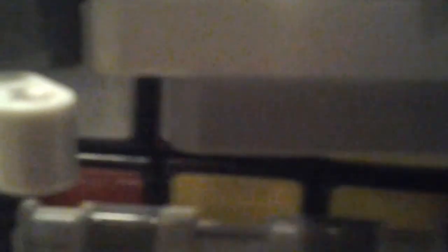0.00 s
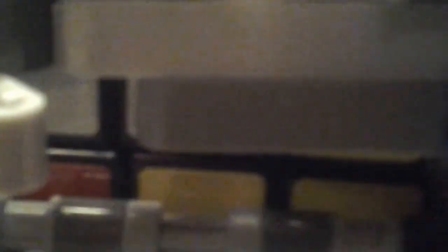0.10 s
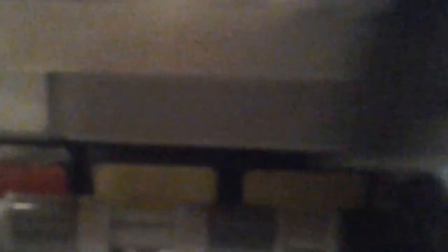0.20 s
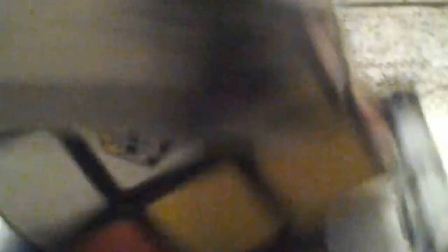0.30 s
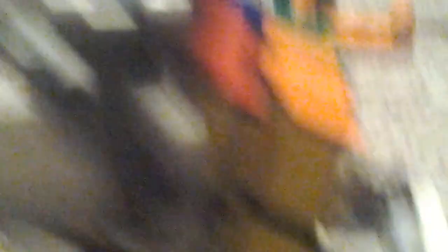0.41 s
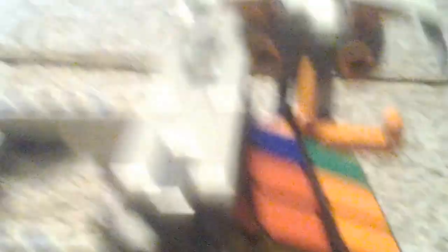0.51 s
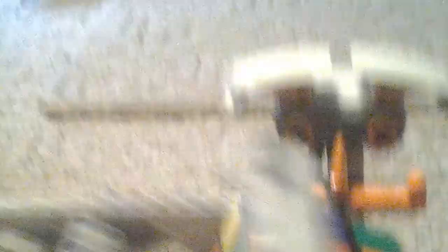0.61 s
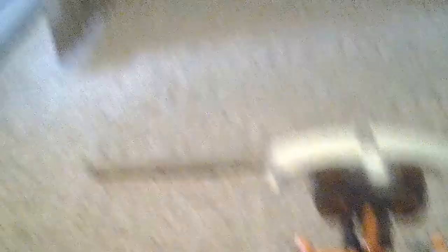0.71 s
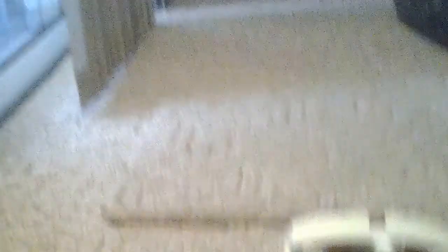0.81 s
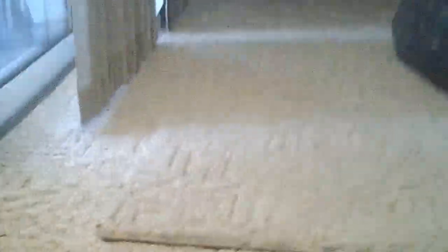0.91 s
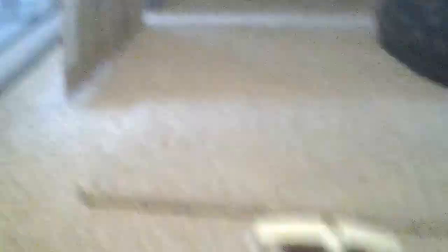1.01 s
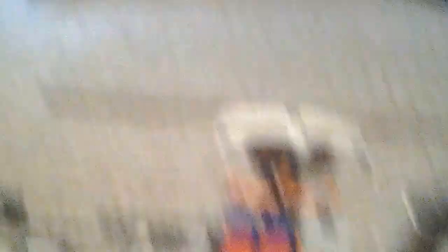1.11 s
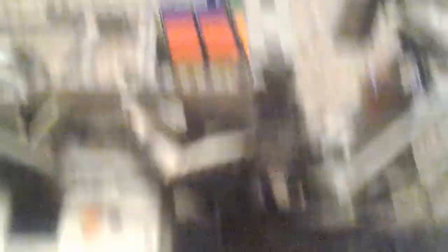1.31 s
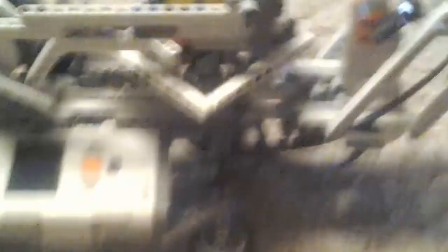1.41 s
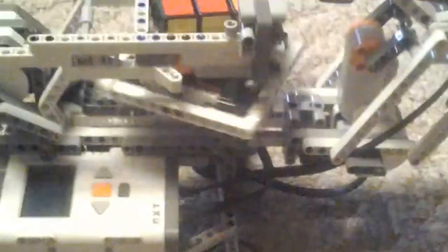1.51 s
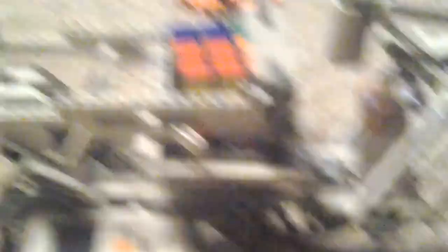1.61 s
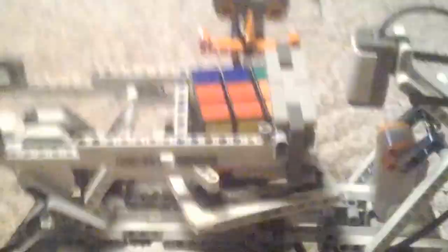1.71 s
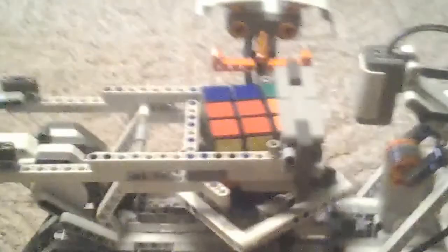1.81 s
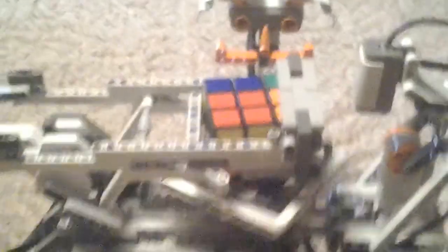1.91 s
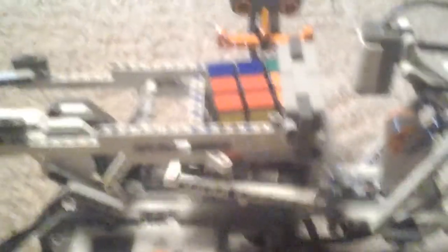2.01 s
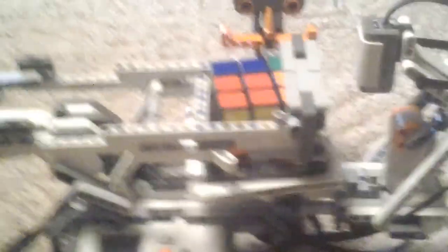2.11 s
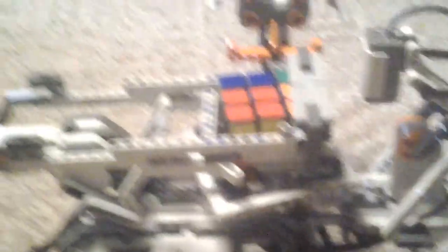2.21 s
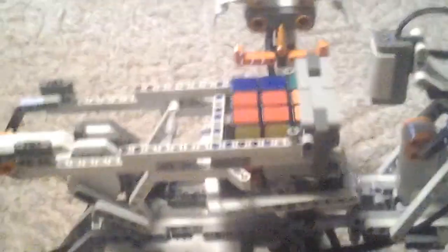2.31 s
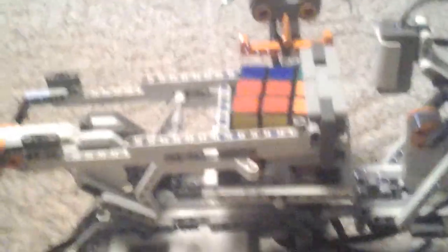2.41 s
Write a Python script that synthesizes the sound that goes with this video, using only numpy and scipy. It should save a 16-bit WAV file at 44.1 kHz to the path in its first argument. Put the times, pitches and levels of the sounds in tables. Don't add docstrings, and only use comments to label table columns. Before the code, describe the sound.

Toy robot motors whine, stutter and coast to a stop as plastic puzzle cube parts clack

```python
import sys
import numpy as np
from scipy import signal
from scipy.fft import rfft, irfft
from scipy.io import wavfile
from scipy.ndimage import uniform_filter1d

SR = 44100
rng = np.random.default_rng(int(sys.argv[2]) if len(sys.argv) > 2 else 0)


def unload_wav(signal):
    wavfile.write(
        sys.argv[1],
        SR,
        np.round(np.clip(np.atleast_2d(signal).T, -1, 1) * 32767).astype(np.int16),
    )


def ratio_of_db(decibels):
    return 10 ** (np.asarray(decibels, float) / 20)


N = 108045


def level(x):
    return x / np.sqrt(np.mean(x ** 2) + 1e-20)


def peak_one(x):
    return x / np.abs(x).max()


def decay(t, t60_s):
    return np.exp(-np.log(1000) * t / t60_s)


def walk(rate_hz):
    hold = max(int(SR / rate_hz), 2)
    steps = np.repeat(rng.standard_normal(N // hold + 1), hold)
    return 2 * np.tanh(uniform_filter1d(steps, hold)[:N] / 1.5)


def band(x, hz, width_hz):
    b, a = signal.iirpeak(hz, hz / max(width_hz, 20), fs=SR)
    return signal.lfilter(b, a, x)


def body(x, peaks, own_db=0):
    total = 0
    for k, (hz, width_hz, db) in enumerate(peaks):
        wide = 1.16 * width_hz
        ring = band(band(x, hz, wide), hz, wide)
        throb_db = own_db * walk(110) if own_db else 0
        total = total + (-1) ** k * ratio_of_db(db + throb_db) * ring
    return total


def motor(rows, orders, peaks, wander, flutter_db, tick_db, chatter_db, chatter_rate):
    t = np.arange(N) / SR
    start_s, mesh_hz, level_db, rough, bright_db = np.array(rows, float).T
    rough = np.clip(np.interp(t, start_s, rough), 0, 1)
    bright_db = np.interp(t, start_s, bright_db)
    speed_hz = np.interp(t, start_s, mesh_hz) * (1 + wander * walk(60))
    turn = 2 * np.pi * np.cumsum(speed_hz) / SR

    whine = 0
    for k, order_db in orders:
        tilt_db = bright_db * (k - 5.5) * (abs(k - 6) < 2)
        tone_db = order_db + tilt_db + min(flutter_db, 5) * walk(chatter_rate / 2)
        whine = whine + ratio_of_db(tone_db) * np.sin(k * turn + 2 * np.pi * rng.random())

    ticks = rng.standard_normal(N) * ratio_of_db(tick_db * np.minimum(rng.exponential(size=N), 6))
    backlash = level(body(ticks, peaks, own_db=chatter_db))
    backlash = backlash * ratio_of_db(chatter_db * walk(chatter_rate) / 2)

    mix = np.sqrt(1 - rough) * level(whine) + np.sqrt(rough) * backlash
    mix = level(mix * ratio_of_db(chatter_db * walk(21.77) / 2))
    running = (t > start_s[0]) & (t < start_s[-1])
    on = uniform_filter1d(1. * running, 200)
    return mix * ratio_of_db(np.interp(t, start_s, level_db)) * on


def hits(rows, peaks, t60_s, crack_db, tail_db, rise_s):
    length = 9000
    out, t = np.zeros(N + length), np.arange(length) / SR
    rise = np.minimum(1, (t + 1 / SR) / max(rise_s, 1 / SR))
    crack_t60_s, tail_t60_s, body_ring_db = 0.0041, 0.066, -1
    for start_s, peak_db, ring_hz in rows:
        noise = rng.standard_normal(length)
        noise[:2] = 4, -4
        noise = noise * rise
        push = noise * (decay(t, crack_t60_s) + ratio_of_db(tail_db) * decay(t, tail_t60_s))
        ring = band(noise * decay(t, max(t60_s / 3, .002)), ring_hz, 8.1 / max(t60_s, .005))
        housing = body(push, peaks)
        crack = np.diff(push, prepend=0)
        one = peak_one(ring) + ratio_of_db(body_ring_db) * peak_one(housing) + ratio_of_db(crack_db) * peak_one(crack)
        i = int(start_s * SR)
        out[i:i + length] += ratio_of_db(peak_db) * peak_one(one)
    return out[:N]


# pitch_hz [Hz], level_db [dB per Hz]
ROOM_COLOUR = [(18, -44), (30, -4.5), (417, 10.5), (1740, -0.5), (2130, 9.5), (2670, -39), (4750, -13.5),
               (7450, -16.5), (12000, -3), (15600, -52), (22000, -120)]


def room():
    hz = np.maximum(np.fft.rfftfreq(N, 1 / SR), 1)
    point_hz, point_db = np.array(ROOM_COLOUR).T
    shape = ratio_of_db(np.interp(np.log(hz), np.log(point_hz), point_db))
    hiss = level(irfft(rfft(rng.standard_normal(N)) * shape, N))
    return hiss * ratio_of_db(-52 + 0.5 * walk(12.0))


# time_s [s], level_db [dB]
SLIDING = [(0, -26.5), (0.029, -51.5), (.4, -30), (.45, -26), (.52, -35.5), (.535, -48.5), (.9, -37.5),
           (0.988, -30.5), (1.06, -44), (1.131, -34.5), (1.199, -28), (1.3, -52), (2.405, -64),
           (2.435, -34)]
# pitch_hz [Hz], width_hz [Hz], level_db [dB]
CUBE_BODY = [(490, 1200, -33.5), (1490, 1850, -18), (2800, 1670, -9.5), (4595, 2180, -5.5),
             (7340, 3000, -29.5)]


def rustle():
    grains = rng.standard_normal(N) * ratio_of_db(3 * rng.exponential(size=N)) * ratio_of_db(3 * walk(70))
    time_s, level_db = np.array(SLIDING).T
    return level(body(grains, CUBE_BODY)) * ratio_of_db(np.interp(np.arange(N) / SR, time_s, level_db))


# start_s [s], peak_db [dB], ring_hz [Hz]
CLICK_HITS = [(0.0098, -17.5, 3800), (0.0503, -26, 4700), (0.0792, -22.5, 5300), (0.0893, -30, 4550),
              (0.1163, -40, 4700), (0.1223, -15.5, 5430), (0.139, -26, 3200), (0.158, -23, 3800),
              (0.1736, -27.5, 5140), (0.184, -25, 3960), (0.3396, -12, 4500), (0.343, -8.5, 4600),
              (0.3511, -6, 3760), (0.3596, -6, 3840), (0.362, -10.5, 5000), (0.366, -18, 1860),
              (0.3967, 3, 3082), (0.4018, -2, 4600), (0.4408, -14.5, 4230), (0.4873, -15, 2820),
              (0.5106, -12, 2800), (0.5412, -32, 4870), (0.556, -16, 4430), (0.5668, -40.5, 4350),
              (0.5703, -26, 4430), (1.0309, -15, 5080), (1.074, -31, 4170), (1.0859, -23, 5430),
              (1.1487, -19.5, 4710), (1.4135, -1.5, 7570), (2.4218, -28, 4340), (2.4336, -18, 4370)]


def clicks():
    return hits(CLICK_HITS, CUBE_BODY, t60_s=0.029, crack_db=-11.5, tail_db=-1, rise_s=0)


# start_s [s], mesh_hz [Hz], level_db [dB], roughness [0-1], bright_db [dB per multiple]
ARM_RUN = [(.185, 439.5, -30, 1.1, 3), (.203, 459.7, -14, 1.1, 4.5), (.232, 560, -10, 0.68, 7.5),
           (.25, 628, -9.5, 0.36, 5.5), (.268, 673.6, -8, 0.34, -1), (.29, 684.4, -10, 0.26, 1),
           (.31, 701.7, -9, 0.37, -1), (.332, 738.6, -10, 0.35, -4.5), (.345, 734, -30, 0.99, -6.5)]
# multiple [of the mesh rate], level_db [dB]
ARM_WHINE = [(1, -44), (2, -18), (3, -12), (4, -17), (5, 2), (6, -5), (7, 0.5), (8, -11.5), (9, -15),
             (10, -26.5), (11, -15.5), (12, -35)]
# pitch_hz [Hz], width_hz [Hz], level_db [dB]
ARM_HOUSING = [(1440, 550, -19.5), (2412, 600, -13.5), (3630, 850, -5), (4370, 1127, -4), (6200, 2250, -15),
               (7990, 1290, -14.5), (10500, 2600, -19)]


def arm_motor():
    return motor(ARM_RUN, ARM_WHINE, ARM_HOUSING, wander=0.00198, flutter_db=1.5,
                 tick_db=1.2, chatter_db=1.0, chatter_rate=150)


# start_s [s], peak_db [dB], ring_hz [Hz]
JOLT_HITS = [(.230, -2.5, 3748), (.589, -4.5, 4500), (.600, -1.5, 4150), (.605, -7, 3870), (.614, -1, 4570),
             (.631, -1, 6470), (.641, -6.5, 4500), (.649, -3.5, 4600), (.665, -10.5, 4270),
             (.6706, -3.5, 4500), (.673, -5, 6400), (.679, -3, 4540), (.687, -12, 6340),
             (.6945, -7.5, 5170), (.7005, -20, 4250), (.7065, -2.5, 4600), (.710, -3.5, 2800),
             (.7155, -2.5, 4330), (.727, -3.5, 4500), (.753, -10.5, 3000), (.7705, -6.5, 3860),
             (.776, -5.5, 4220), (.788, -13.5, 4160), (.801, -13, 2500), (.8195, -13, 4430),
             (.8447, -4.5, 4600), (.87, -7, 3780), (.902, -19.5, 2470), (1.213, -15.5, 3700),
             (1.275, -9, 4500), (1.685, -11.5, 4500), (1.9485, -15.5, 2340), (2.014, -10, 4570),
             (2.111, -9.5, 4290), (2.278, -22.5, 2260), (2.326, -22.5, 2240), (2.405, -37, 2360)]
# pitch_hz [Hz], width_hz [Hz], level_db [dB]
TWIST_HOUSING = [(1140, 1000, -23.5), (2820, 1071, -5.5), (4430, 840, 2), (3930, 1400, -11),
                 (6470, 550, -10.5), (8500, 2100, -21), (10140, 1800, -19.5)]


def jolts():
    return hits(JOLT_HITS, TWIST_HOUSING, t60_s=0.035, crack_db=-36.5, tail_db=-11, rise_s=0.0019)


# start_s [s], mesh_hz [Hz], level_db [dB], roughness [0-1],
# bright_db [dB per multiple]
TWIST_RUN = [(.555, 473.3, -31, 0.87, 7.5), (.592, 530, -17, 0.77, 1.5), (.625, 635.7, -13.5, 0.64, 1),
             (.655, 658, -15, 0.85, 8), (.665, 640, -18.5, 0.9, 3), (.74, 625.5, -20, 1.23, 8),
             (.81, 625, -24.5, 1.06, 9), (.88, 630, -18.5, 0.77, 5), (.915, 620, -34.5, 0.7, 0)]


def twist_motor():
    return motor(TWIST_RUN, ARM_WHINE[2:8], TWIST_HOUSING, wander=0.0072, flutter_db=4,
                 tick_db=2.5, chatter_db=3.5, chatter_rate=170)


# start_s [s], length_s [s], peak_db [dB], pitch_hz [Hz]
SLIPS = [(0.618, .013, -4, 4465), (0.653, 0.0069, -15, 4600), (.715, .006, -9.5, 4310),
         (0.723, 0.0094, -6, 4370), (0.769, 0.0061, -9.5, 4320), (0.777, .008, -14, 4250),
         (0.824, 0.012, -12, 4370), (0.832, 0.00647, -12.5, 4350), (2.435, 0.0141, -22.5, 4480)]


def squeals():
    out, flutter = np.zeros(N + 2000), ratio_of_db(2.5 * walk(400))
    rise_hz_per_s = 6000
    for start_s, length_s, peak_db, pitch_hz in SLIPS:
        t = np.arange(int(length_s * SR)) / SR
        swell = np.sin(np.pi * t / length_s) ** 0.67
        hz = pitch_hz + rise_hz_per_s * (t - length_s) / 2
        i = int(start_s * SR)
        out[i:i + len(t)] += ratio_of_db(peak_db) * swell * np.sin(2 * np.pi * hz * t)
    return out[:N] * flutter


# start_s [s], peak_db [dB], pitch_hz [Hz], t60_s [s], width [share of pitch]
KNOCKS = [(.706, -20, 1013, 0.065, 0.6), (.832, -27.5, 284, 0.112, 1.25), (0.935, -36.5, 289.6, 0.4, 1.4),
          (.985, -28, 467, 0.29, 0.83), (1.373, -11.5, 1290, 0.0073, 2.8), (1.486, -21, 508, 0.035, 0.89),
          (1.717, -33.5, 364, 0.079, .8)]


def thuds():
    length = 9000
    out, t = np.zeros(N + length), np.arange(length) / SR
    for start_s, peak_db, pitch_hz, t60_s, share in KNOCKS:
        push = rng.standard_normal(length) * decay(t, max(t60_s, .005))
        width_hz = share * pitch_hz
        one = band(band(push, pitch_hz, width_hz), pitch_hz, width_hz)
        i = int(start_s * SR)
        out[i:i + length] += ratio_of_db(peak_db) * peak_one(one)
    return out[:N]


# start_s [s], mesh_hz [Hz], level_db [dB], roughness [0-1], bright_db [dB per multiple]
TABLE_RUN = [(1.13, 741, -47, 0.8, 5.5), (1.21, 771.4, -27.5, 0.97, 7), (1.28, 779.5, -14.5, 0.8, 5),
             (1.4, 777.7, -17, 0.75, 3.5), (1.53, 791.1, -19.5, 0.82, 2), (1.7, 829.4, -20, 0.95, -9),
             (1.8, 802.2, -19.5, .75, -0.5), (1.87, 769, -16.5, 0.56, 0), (1.97, 762, -19.5, 0.59, 3),
             (2.04, 807, -19.5, 0.98, -4), (2.165, 844, -19, 0.8, -2), (2.22, 796.7, -43.5, 0.95, -2)]
# multiple [of the mesh rate], level_db [dB]
TABLE_WHINE = [(1, -32), (2, -8.5), (3, -2.5), (4, -13), (5, 0.5), (6, -1.5), (7, -7.5), (8, -16)]
# pitch_hz [Hz], width_hz [Hz], level_db [dB]
TABLE_HOUSING = [(530, 82, -17.5), (819, 113, -13.5), (1160, 400, -20.5), (1487, 290, -15.5),
                 (2173, 347, 4), (3440, 540, -10.5), (3960, 390, 0), (4600, 480, 1), (5242, 650, -7),
                 (6610, 670, -6), (8090, 1384, -16), (9950, 1310, -22.5)]


def table_motor():
    return motor(TABLE_RUN, TABLE_WHINE, TABLE_HOUSING, wander=0.0105, flutter_db=6.0,
                 tick_db=2.0, chatter_db=2.5, chatter_rate=140)


# start_s [s], mesh_hz [Hz], level_db [dB], roughness [0-1], bright_db [dB per multiple]
COAST_RUN = [(2.19, 760, -35.5, 1.23, 0), (2.24, 748, -33, 0.94, 0), (2.29, 749, -25.5, 1, 0),
             (2.43, 720, -39, 0.99, 0)]
# pitch_hz [Hz], width_hz [Hz], level_db [dB]
COAST_HOUSING = [(1493, 1700, -22.5), (2300, 385, 3), (3663, 447, -11), (4500, 1100, -7.5),
                 (6100, 2500, -18), (8900, 2200, -30)]


def coasting_gears():
    return motor(COAST_RUN, TABLE_WHINE[:3], COAST_HOUSING, wander=0.026, flutter_db=7.5,
                 tick_db=3.5, chatter_db=3, chatter_rate=180)


def scene():
    background = room() + rustle()
    motors = arm_motor() + twist_motor() + table_motor() + coasting_gears()
    impacts = clicks() + jolts() + thuds()
    mono = background + motors + impacts + squeals()
    return np.array([mono, mono])


def drop_weak_bands(x):
    mask_db, bass_extra_db, bass_bins = -37.5, 6.5, 33
    _, _, z = signal.stft(x, nperseg=2048, noverlap=1024)
    bins = z.shape[1]
    edges = np.unique(np.geomspace(4, bins, 90).astype(int))
    which = np.searchsorted(edges, np.arange(bins) + 1)
    power = np.array([np.mean(np.abs(z[0, which == k]) ** 2, axis=0) for k in range(which.max() + 1)])
    nearby = uniform_filter1d(power, size=5, axis=0)
    limit_db = mask_db + bass_extra_db * np.clip((bass_bins - edges) / 4, 0, 1)
    limit = power.max(axis=0) * ratio_of_db(2 * limit_db)[:len(power), None]
    keep = np.minimum(power, nearby) > limit
    return signal.istft(z * keep[which], nperseg=2048, noverlap=1024)[1][:, :N]


def roll_off(x):
    return signal.sosfilt(signal.butter(12, 15570, fs=SR, output="sos"), x)


def record(dry):
    low_pass = signal.butter(3, 12060, fs=SR, output="sos")
    soft = signal.sosfilt(low_pass, dry)
    clipped = np.clip(drop_weak_bands(soft), -1, 1)
    return roll_off(clipped)


dry = scene()
out = record(dry)
unload_wav(out)
```